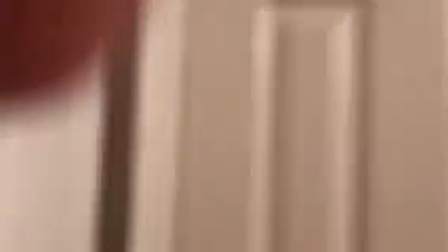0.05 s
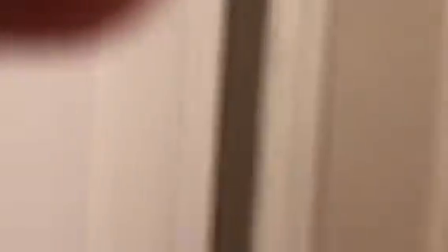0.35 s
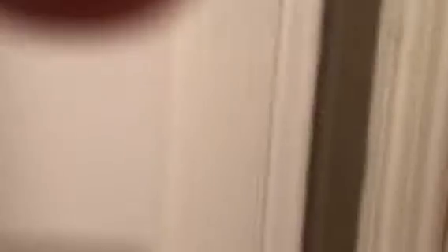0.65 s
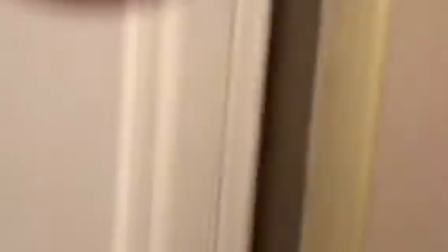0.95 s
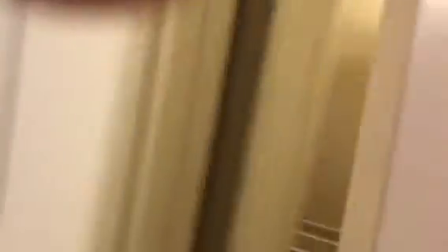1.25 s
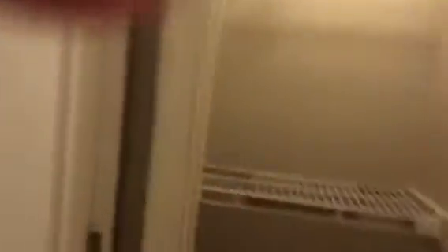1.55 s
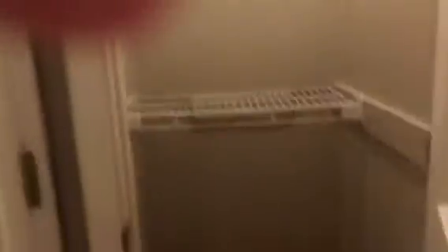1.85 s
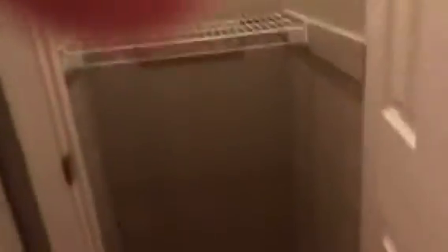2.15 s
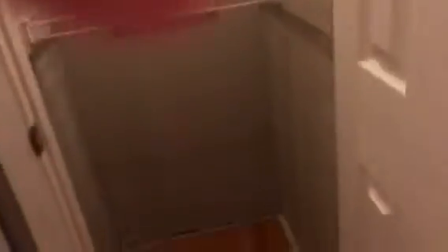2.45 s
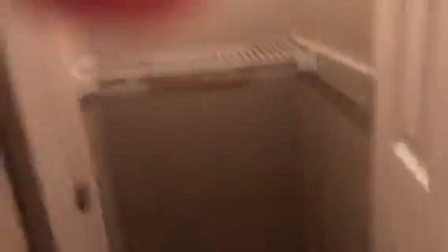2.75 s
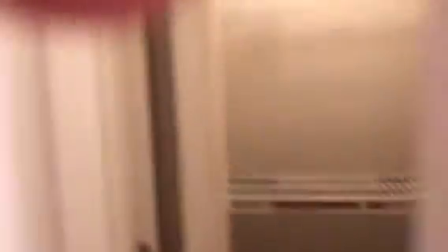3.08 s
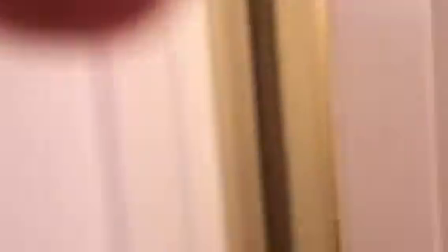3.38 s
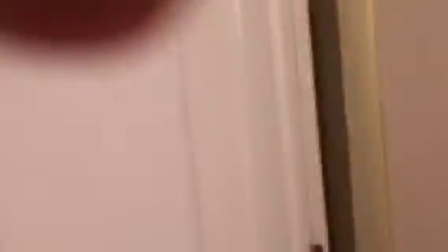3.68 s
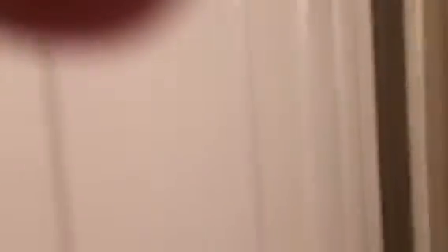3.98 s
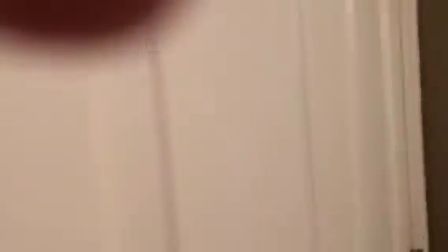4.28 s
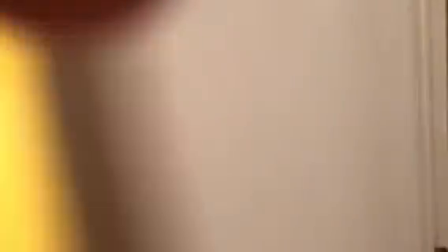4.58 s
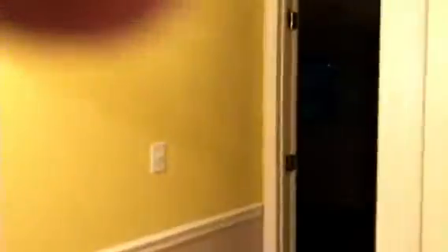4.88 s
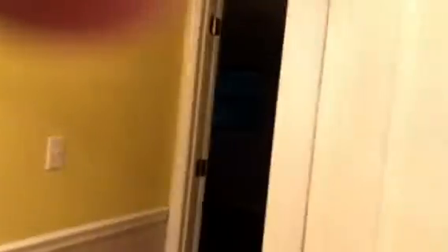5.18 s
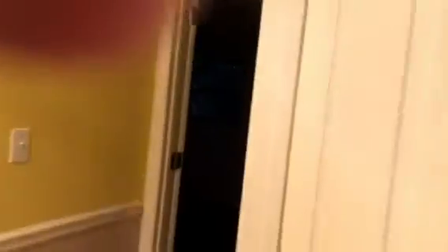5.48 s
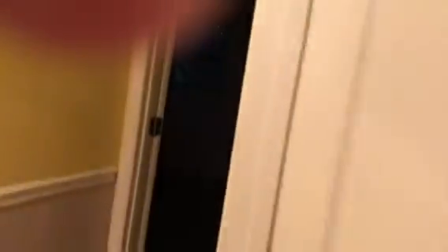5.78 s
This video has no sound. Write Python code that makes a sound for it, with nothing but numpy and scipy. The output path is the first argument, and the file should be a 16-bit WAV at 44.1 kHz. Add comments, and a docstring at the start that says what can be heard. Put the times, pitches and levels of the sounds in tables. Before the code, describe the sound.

A hollow closet door clicks open and knocks shut, then another door's latch snaps, while dog tags tinkle in a bare hallway.

```python
"""A bare hallway, one hand-held microphone near two hollow panel doors worked by hand.
First a closet knob clicks and its spring rings; the door is pulled free, swings open and, past 3 s,
knocks shut. Near 4 s the hall door's latch snaps and its bolt slides over the plate. A dog's tags,
faint until now, tinkle, and near the end that door is bumped. Each knock rings on in the hallway;
in between, feet thud and clothes rub softly over the quiet air of the house."""
import sys
import numpy as np
from scipy import signal
from scipy.fft import rfft, irfft, next_fast_len
from scipy.io import wavfile
from scipy.ndimage import map_coordinates

SR = 44100
rng = np.random.default_rng(int(sys.argv[2]) if len(sys.argv) > 2 else 0)


def master(y):
    """Save y as 16-bit WAV."""
    cut = np.clip(np.atleast_2d(y).T, -1, 1)
    pcm = np.round(cut * 32767)  # scale
    wavfile.write(sys.argv[1], SR, pcm.astype(np.int16))


N = 261513
TIME = np.arange(N) / SR
AGE = TIME[:SR]  # seconds since a contact
BAND_HZ = np.geomspace(30, 18000, 34)

# resonances of each struck part: pitch_hz, lift_db (over its broad ring)
KNOB = [(192, 6.5), (249, 10.5), (501, 7), (1494, 12.5), (1827, 15), (5447, 5), (6660, 8), (8965, 15.5),
        (11252, 13), (13055, 9.5)]
BOLT = [(406, 7.2), (542, 8.7), (1843, 5.8), (2502, 7.6), (3368, 13), (3908, 9.9), (5543, 3.1)]
CLOSET_LATCH = [(253, 16), (410, 7), (492, 7.7), (618, 2.8), (869, 2.3), (1455, 6.5), (1749, 2.5),
                (2047, 5), (5447, 8.6), (11450, 15)]
LIGHT_TAPS = [(300, 8), (545, 3), (725, 3.5), (1290, 6), (3050, 4.5), (7700, -26.5)]
HINGE = [(3170, 11), (4830, 8), (5730, 9), (6550, 8), (7560, 8.5)]
CLOSET_PANEL = [(168, 2.5), (207, 10.5), (253, 10.5), (294, 8), (369, 6), (640, 5), (948, 8), (1140, 9.5),
                (1749, 2), (2029, 5), (3253, 5.5), (5495, 8), (6602, 5), (11200, 10.5)]
HALL_LATCH = [(220, 5.3), (251, 16), (291, 16.7), (749, 3.6), (1060, 7), (1330, 8), (1560, 7.6), (1760, 5),
              (1959, 6.3), (2214, 2.1), (3398, 5.9), (4228, 2.3), (5592, 6.3), (7593, 2.9), (9123, 3.9)]
HALL_PANEL = [(179, 7.4), (281, 10), (403, 3.7), (523, 4.4), (736, 4.6), (892, 8.6), (1053, 6.2),
              (2481, 7.7), (2828, 8.6), (3708, 5.6), (4340, 6.1), (5997, 2.7), (6719, 8.3), (7527, 6.8)]
# which part is being struck: from_s, resonances, decay_ratio (to the hallway's decay time)
STRUCK_PARTS = [(0, KNOB, 1.18), (.6, BOLT, 0.87), (.9, CLOSET_LATCH, 0.9), (1.3, LIGHT_TAPS, 1.1),
                (2.3, HINGE, 1.1), (3.0, CLOSET_PANEL, 0.97), (3.7, HALL_LATCH, 0.91),
                (4.3, LIGHT_TAPS, 1.02), (5.1, HALL_PANEL, 0.99)]
# decay between the bare walls: frequency_hz, t60_s
HALLWAY_DECAY = [(60, 0.36), (250, 0.57), (700, 0.65), (1800, 0.59), (5000, 0.64), (9000, 0.48),
                 (15000, 0.28)]
# colour all knocks share at the microphone: frequency_hz, level_db
KNOCK_COLOUR = [(50, -16), (120, -21), (200, -4), (330, -2), (480, 0), (720, 3), (1200, 0.5), (1900, 0.5),
                (2600, -4), (3400, -2), (5000, -3.5), (8000, -2.5), (11000, -4), (16000, 1)]
# knob, latch and door contacts: start_s, snap_db, snap_hz, snap_t60_s, ring_db, tilt_db_per_octave
DOOR_CONTACTS = [ (.498, -50, 5970, .012, -45, -4), (.526, -20, 10500, 0.016, -27, -1),
                 (.551, -37, 7900, .018, -36.5, -9), (.567, -31.5, 5930, .012, -28, -2),
                 (0.653, -25, 3800, 0.02, -29, 1.5), (.779, -32.5, 3460, 0.0062, -29.5, -3),
                 (.940, -25.5, 4840, 0.032, -27.5, -0.5), (0.9443, -25, 10560, 0.0024, -25, -2),
                 (1.333, -53.5, 6030, 0.031, -57.5, 3.5), (1.544, -50, 4400, 0.01, -52, 1),
                 (1.615, -38, 4700, 0.013, -35.5, -1.5), (1.648, -37.5, 4420, 0.015, -30.5, -0.5),
                 (1.674, -39.5, 5600, 0.02, -34.5, -3), (1.814, -43.5, 8400, 0.0089, -47, -0.5),
                 (2.0466, -51.5, 5130, 0.023, -43.5, 1), (2.1508, -42.5, 2405, .044, -34.5, -1),
                 (2.359, -43.5, 5830, .016, -47.5, 4.5), (3.066, -58, 1110, .017, -41, -1),
                 (3.164, -52.5, 4340, 0.012, -47, -2), (3.189, -49, 9500, .011, -47.5, -0.5),
                 (3.223, -39, 4300, 0.012, -39, 1), (3.242, -40.5, 1300, 0.0086, -28.5, -1.5),
                 (3.342, -39.5, 11000, .025, -46, -1.5), (3.348, -32, 2600, 0.0061, -17, 0),
                 (3.3522, -34.5, 8100, 0.013, -22, -2), (3.400, -33, 510, 0.025, -37, -1),
                 (3.78, -51, 795, .02, -49, -3.5), (3.892, -17, 5430, 0.016, -16.5, 1.5),
                 (3.893, -17.5, 1380, 0.042, -23, 2), (3.918, -25, 1890, 0.032, -25, 6),
                 (4.125, -46, 3850, 0.018, -26.5, 0), (4.329, -40, 4330, .03, -56, 6),
                 (4.389, -45, 3870, .02, -38, -1), (4.410, -45.5, 14000, .015, -36.5, -7.5),
                 (4.841, -58, 3880, .013, -42.5, -4), (4.892, -50, 1100, .016, -46, -8),
                 (5.283, -50.5, 3470, .018, -51, -1.5), (5.357, -15.5, 4550, 0.005, -18.5, 0.4),
                 (5.808, -40.5, 9100, 0.046, -45.5, 1), (5.872, -47, 6100, 0.039, -43.5, -2)]
def doors(early_gain=0.69, early_s=0.018, rise_s=0.0024, wash_db=-2.0, panel_db=-34.5):
    """Each contact snaps, rings its part and fills the hallway, strongest in the first reflections."""
    out, bands = np.zeros(N), noise_bands()
    onset = swell(rise_s) * (1 + early_gain * np.exp(-AGE / early_s))
    hallway_t60 = at_hz(HALLWAY_DECAY, BAND_HZ)[:, None]
    decays = [fade(ratio * hallway_t60) * onset for _, _, ratio in STRUCK_PARTS]
    for start_s, snap_db, snap_hz, snap_t60, ring_db, tilt_db in DOOR_CONTACTS:
        part = sum(start_s >= from_s for from_s, _, _ in STRUCK_PARTS[1:])
        _, resonances, decay_ratio = STRUCK_PARTS[part]
        blow = ring_db, tilt_db, snap_hz
        offset = rng.integers(bands.shape[1] - SR)
        dying_bands = bands[:, offset:offset + SR] * decays[part]
        gains = from_db(wash_db + blow_db(BAND_HZ, *blow) + at_hz(KNOCK_COLOUR, BAND_HZ))
        wash = resonate(gains @ dying_bands, resonances)
        tones = from_db(panel_db) * low_modes(resonances, blow, decay_ratio) * onset
        add(out, start_s, snap(snap_db, snap_hz, snap_t60) + wash + tones)
    return out


def snap(db, hz, t60, width_ratio=1.377, skirt_db=-19, rise_s=0.001):
    """The direct sound of a contact: a brief noise burst around one pitch, with a wide, weak skirt."""
    burst = rng.standard_normal(len(AGE)) * fade(t60) * swell(rise_s) + 1e-18
    core = bandpass(burst, np.clip([hz / width_ratio, hz * width_ratio], 100, .45 * SR))
    skirt = bandpass(burst, np.clip([hz / 4, hz * 4], 50, .45 * SR), order=1)
    click = core + from_db(skirt_db) * skirt
    return from_db(db) * click / click[:SR // 200].std()  # level set by the first 5 ms


def blow_db(hz, ring_db, tilt_db, snap_hz, reach_ratio=1.7, fall_db_per_octave=20.5, max_fall_db=29.5):
    """How hard a contact drives each frequency: a briefer one snaps higher and rings further up."""
    octaves_beyond = np.log2(1 + (hz / (reach_ratio * snap_hz)) ** 4) / 4
    fall_db = np.minimum(fall_db_per_octave * octaves_beyond, max_fall_db)  # soft contacts keep some grit
    return ring_db + tilt_db * np.log2(hz / 1000) - fall_db


def resonate(wash, resonances, q=38.0):
    """Lift the narrow bands in which a part rings."""
    out = wash
    for hz, db in resonances:
        bandwidth_hz = hz / q + 8
        b, a = signal.iirpeak(hz, hz / bandwidth_hz, fs=SR)
        out = out + (from_db(db) - 1) * signal.lfilter(b, a, wash)
    return out


def low_modes(resonances, blow, decay_ratio, limit_hz=1250):
    """A part's lowest modes stand far enough apart to sound as separate decaying tones."""
    out = np.zeros(len(AGE))
    for hz, db in resonances:
        if hz < limit_hz:
            envelope = from_db(db + blow_db(hz, *blow)) * fade(decay_ratio * at_hz(HALLWAY_DECAY, hz))
            out += envelope * np.sin(2 * np.pi * (hz * AGE + rng.random()))
    return out


# partials of the knob and its spring: pitch_hz, level_db, t60_s
SPRING_MODES = [(5540, -14, .5), (6690, -11, .3), (7040, -4, .5), (8236, 0, .42), (8450, -8, .25),
                (8640, -7, .25), (8818, -5, .33), (11210, -14, .2), (12970, -15, .2)]
# jolts to the closet knob: start_s, level_db
KNOB_TOUCHES = [(0.525, -30), (.567, -30), (1.816, -42)]
def knob_spring(gain_db=-6.0):
    """A jolt sets the knob and its spring ringing thinly."""
    out = np.zeros(N)
    for start_s, db in KNOB_TOUCHES:
        add(out, start_s, from_db(db + gain_db) * metal_ring(SPRING_MODES, shimmer=.8, per_s=152.0))
    return out


# partials of each tag: pitch_hz, level_db, t60_s
LARGE_TAG = [(3300, -8, .35), (3500, -3, .42), (3600, -6, .35), (3700, -4, .38), (3860, -11, .3),
             (5098, -16, .3), (5674, -9, .17)]
SMALL_TAG = [(9570, -8, .25), (11100, -5, .26), (14170, -6, .1), (14740, -9, .22), (15000, -10, 0.12),
             (15460, -10, .2)]
# the tags touch: start_s, large_tag_db, small_tag_db
TAG_TOUCHES = [(1.098, -75, -54), (3.035, -73, -61.5), (4.33, -49, -60), (4.389, -51.5, -56),
               (4.411, -54, -57), (5.283, -56.5, -61), (5.545, -65, -42.5), (5.618, -57, -46.5),
               (5.774, -54.5, -48)]
def dog_tags(gain_db=5.0):
    """The dog's two tags strike each other and both ring, the small one higher."""
    out = np.zeros(N)
    for start_s, large_db, small_db in TAG_TOUCHES:
        add(out, start_s, from_db(large_db + gain_db) * metal_ring(LARGE_TAG, shimmer=1.4, per_s=197.0))
        add(out, start_s, from_db(small_db + gain_db) * metal_ring(SMALL_TAG, shimmer=4.5, per_s=312.0))
    return out


def metal_ring(modes, shimmer, per_s):
    """Decaying partials of small metal; reflections make each one shimmer on its own."""
    out, knots = 0, np.arange(0, 1.1, 1 / per_s)
    for hz, db, t60 in modes:
        echoes = np.interp(AGE, knots, rng.standard_normal((len(knots), 2)) @ [1, 1j])
        tone = np.exp(2j * np.pi * (hz * AGE + rng.random())) * (1 + shimmer * echoes)
        out = out + from_db(db) * fade(t60) * tone.real
    return out / np.sqrt(1 + 2 * shimmer ** 2)


# footfalls on the hallway floor and dull bumps of the doors: start_s, level_db, pitch_hz, t60_s
THUDS = [(0.554, -31, 240, 0.13), (0.833, -40, 416, 0.2), (.841, -36, 120, .13), (0.949, -21, 472, 0.056),
         (1.539, -51, 245, 0.56), (1.878, -57, 69.4, 0.23), (2.19, -48.5, 74.3, .24),
         (2.42, -47, 106, 0.13), (2.439, -50.5, 230, 0.35), (2.63, -56, 248, 0.32),
         (2.778, -55, 190.7, .21), (2.948, -59, 89.7, 0.28), (3.069, -42, 89, 0.14),
         (3.358, -34, 206.6, 0.54), (3.623, -41.5, 114, .082), (3.759, -40, 150, 0.13),
         (3.894, -42, 67.4, 0.44), (3.895, -20.5, 208.7, 0.2), (3.97, -41, 70, 0.22),
         (4.304, -20, 205, 0.042), (4.313, -24, 91.4, .085), (4.425, -27.5, 307, 0.06),
         (4.472, -38, 291.7, 0.27), (4.481, -39.5, 97, 0.14), (4.70, -40.5, 110, .06),
         (4.755, -42, 103.6, 0.1), (4.892, -29.5, 81.2, 0.084), (4.949, -34, 186, 0.11),
         (4.981, -45, 70, 0.099), (5.037, -39, 149, 0.067), (5.167, -36, 140, 0.1),
         (5.364, -26.5, 517, 0.17), (5.37, -37.5, 182.4, 0.52)]
def thuds(rise_s=0.0072, scuff_db=-7):
    """A soft push swings the floor or a door briefly, with a dull scuff on top."""
    out = np.zeros(N)
    for start_s, db, hz, t60 in THUDS:
        scuff = bandpass(rng.standard_normal(SR), [hz / 2, hz * 2])
        swing = np.sin(2 * np.pi * hz * AGE) + from_db(scuff_db) * scuff / scuff.std()
        add(out, start_s, from_db(db) * swing * fade(t60) * swell(rise_s))
    return out


# arm, clothes and swinging doors on the move: start_s, length_s, rub_db, hiss_db
MOVES = [(-.1, 0.78, -57, -61.5), (0.607, 0.26, -43, -50.5), (.95, 0.21, -51, -62.5),
         (1.166, 0.86, -54, -65), (1.454, 0.055, -53, -56.5), (1.66, 0.15, -51.5, -78),
         (2.541, 0.24, -59.5, -72), (3.17, 0.33, -49, -58), (3.776, .545, -49, -57),
         (3.912, .11, -36, -45.5), (4.861, 0.58, -60, -67), (5.185, 0.62, -56, -57),
         (5.417, 0.16, -71, -46)]
def movement(idle_rub_db=-72, idle_hiss_db=-87.5):
    """Envelopes of rub and hiss: movements add in power, over cloth that never quite rests."""
    rub_power, hiss_power = from_db(idle_rub_db) ** 2, from_db(idle_hiss_db) ** 2
    for start_s, length_s, rub_db, hiss_db in MOVES:
        move = stroke(start_s, length_s, attack_s=0.063, release_t60=0.57)
        rub_power += (from_db(rub_db) * move) ** 2
        hiss_power += (from_db(hiss_db) * move) ** 2
    return np.sqrt(rub_power), np.sqrt(hiss_power)


# dull rub of cloth and bright hiss of its fibres: frequency_hz, density_db
RUB_COLOUR = [(18, -36.5), (30, -5.5), (135, -6.5), (397, -7.5), (481, -2), (655, -8.5), (908, -5.5),
              (1020, -10.5), (1100, -8.5), (3000, -19.5), (3900, -44), (6600, -120)]
HISS_COLOUR = [(1180, -24), (2000, -6.5), (3040, -1.5), (4410, -4.5), (5210, -3.5), (8120, -12.5),
               (15100, -19), (16000, -20)]
def clothes(rub, hiss, rub_db=-1.0, hiss_db=-0.46, uneven_db=0.5, grain_db=1.5):
    """Moving cloth makes friction noise that catches and lets go."""
    catch_db = uneven_db * flutter(25)
    cloth = rub * from_db(rub_db + catch_db) * coloured(RUB_COLOUR, patchy_db=5.0, per_s=15.0)
    grain = from_db(hiss_db + catch_db + grain_db * flutter(400))
    fibres = hiss * grain * coloured(HISS_COLOUR, patchy_db=2.5, per_s=12.0)
    return cloth + fibres


# metal sliding on metal at the hall door: frequency_hz, density_db
SLIDE_COLOUR = [(2000, -24), (5000, -11), (9000, -2), (13000, 3), (16000, -3)]
def bolt_slide(start_s=4.118, length_s=0.18, level_db=-40, sag_db_per_s=-78, grain_db=1.5):
    """The latch bolt slides over its plate, losing pressure as it goes."""
    sag_db = sag_db_per_s * np.clip(TIME - start_s, 0, length_s)
    envelope = from_db(level_db + sag_db) * stroke(start_s, length_s, attack_s=0.0073, release_t60=0.3)
    return envelope * from_db(grain_db * flutter(300)) * coloured(SLIDE_COLOUR)


def loose_ticks(hiss, per_s=12, relative_db=-3.5, spread_db=7.5, low_hz=3500, high_hz=13000):
    """Loose hardware ticks faintly at random, its level following the hiss of the movement."""
    out = np.zeros(N)
    for when, pitch, size in rng.random((int(per_s * N / SR), 3)):
        hz = low_hz * (high_hz / low_hz) ** pitch
        add(out, when * TIME[-1], snap(relative_db + spread_db * (2 * size - 1), hz, t60=.012))
    return out * hiss


# the floor under the microphone: frequency_hz, density_db
RUMBLE_COLOUR = [(25, -10.5), (45, -1), (70, -1), (110, -9), (200, -7), (400, -29.5), (1000, -70.5)]
def floor_rumble(gain_db=-1.0, still_db=-73.5, shake_db=-31.5, weight_share=0.49, db_per_octave=-2.5):
    """Every thud shakes the floor: a low one most, a heavy one less than in proportion."""
    power = np.full(N, from_db(still_db) ** 2)
    for start_s, db, hz, _ in THUDS:
        strength = from_db(shake_db + weight_share * db + db_per_octave * np.log2(hz / 100))
        add(power, start_s, (strength * swell(rise_s=.015) * fade(t60=0.56)) ** 2)
    return np.sqrt(power) * from_db(gain_db) * coloured(RUMBLE_COLOUR, patchy_db=5.0)


# room tone in the hallway: frequency_hz, density_db
AIR_COLOUR = [(40, -5), (300, 1), (1000, -13.5), (4000, -20.5), (16000, -24)]
def house_air(level_db=-68.5):
    """The still air of the house is a faint, steady, dull noise."""
    return from_db(level_db) * coloured(AIR_COLOUR)


def from_db(db):
    """Decibels to gain."""
    return 10 ** (np.asarray(db) / 20)


def at_hz(points, hz):
    """Read a table on a log-frequency axis."""
    table_hz, value = np.transpose(points)
    return np.interp(np.log(hz), np.log(table_hz), value)


def add(out, start_s, sound):
    """Mix a sound in at a time."""
    i = int(round(start_s * SR))
    out[i:i + len(sound)] += sound[:N - i]


def fade(t60):
    """Exponential decay, one second long."""
    return from_db(-60 * AGE / t60)


def swell(rise_s):
    """Build-up from silence to one."""
    return 1 - np.exp(-AGE / rise_s)


def stroke(start_s, length_s, attack_s, release_t60):
    """Envelope of one movement: attack, hold, release."""
    age = TIME - start_s
    return np.clip(age / attack_s, 0, 1) * from_db(-60 * np.clip((age - length_s) / release_t60, 0, 3))


def flutter(per_s):
    """Random wander with a spread near 1."""
    knots = np.arange(0, N / SR + 1, 1 / per_s)
    return np.interp(TIME, knots, rng.standard_normal(len(knots)))


def bandpass(x, edges_hz, order=2):
    """Keep the band between two edges."""
    return signal.sosfilt(signal.butter(order, edges_hz, "band", fs=SR, output="sos"), x)


def noise_bands(size=2 ** 17):
    """White noise split into overlapping bands that sum back to it."""
    white = rfft(rng.standard_normal(size))
    hz = np.arange(size // 2 + 1) * SR / size
    return np.array([irfft(white * np.interp(hz, BAND_HZ, band)) for band in np.eye(len(BAND_HZ))])


def coloured(spectrum, patchy_db=0, per_s=16.0):
    """Noise of a given colour, rms 1; each narrow band wanders on its own by about patchy_db."""
    hz, times, cells = signal.stft(rng.standard_normal(N), SR, nperseg=1024)
    patches = rng.standard_normal((len(BAND_HZ), len(times)))
    band_index = np.interp(hz, BAND_HZ, np.arange(len(BAND_HZ)))
    grid = np.meshgrid(band_index, times * per_s, indexing="ij")
    wander = from_db(patchy_db * map_coordinates(patches, grid, order=1))
    size = next_fast_len(N)
    bins = rfft(signal.istft(cells * wander, SR)[1], size)
    colour = from_db(at_hz(spectrum, np.linspace(1, SR / 2, len(bins))))
    noise = irfft(bins * colour, size)[:N]
    return noise / noise.std()


def scene():
    """The hallway in mono, from one hand-held microphone."""
    rub, hiss = movement()
    contacts = doors() + knob_spring() + dog_tags() + thuds()
    friction = clothes(rub, hiss) + bolt_slide()
    background = floor_rumble() + house_air()
    return (contacts + friction + loose_ticks(hiss) + background)[None]


def record(dry, low_cut_hz=42, high_cut_hz=16000):
    """The microphone thins the deep bass; the top is cut steeply."""
    thinned = signal.sosfilt(signal.butter(4, low_cut_hz, "high", fs=SR, output="sos"), dry)
    return signal.sosfilt(signal.ellip(10, .2, 80, high_cut_hz, fs=SR, output="sos"), thinned)


dry = scene()
out = record(dry)
master(out)
```